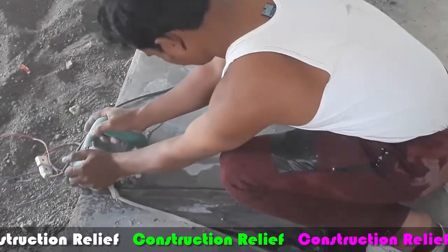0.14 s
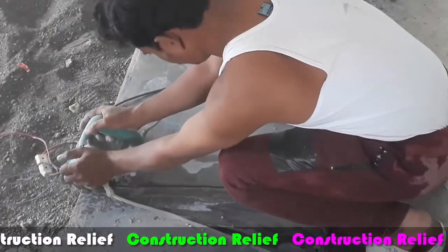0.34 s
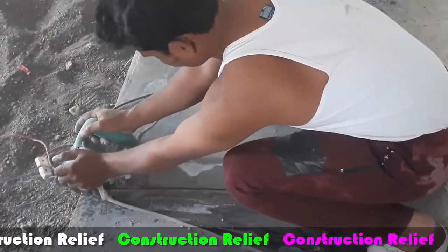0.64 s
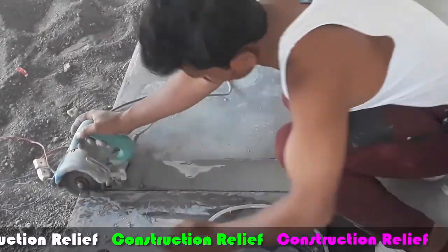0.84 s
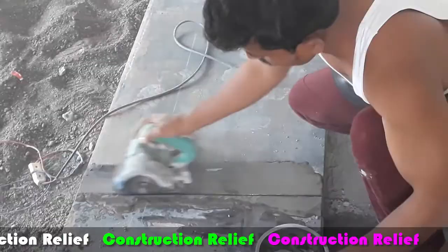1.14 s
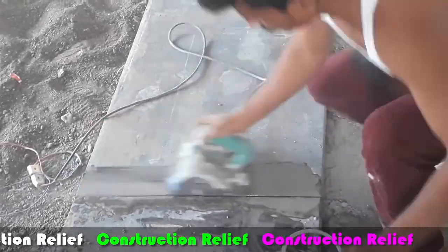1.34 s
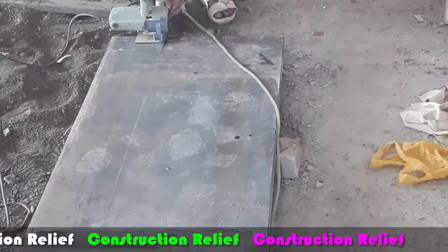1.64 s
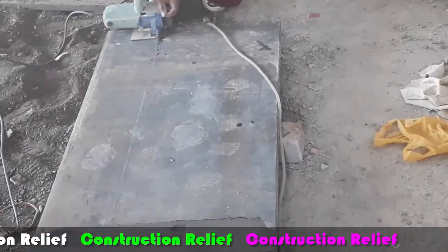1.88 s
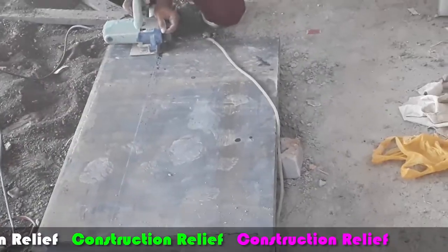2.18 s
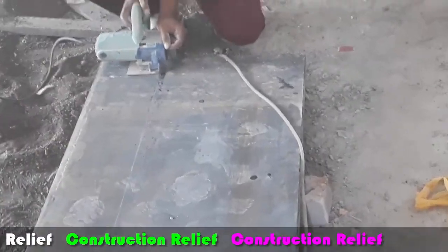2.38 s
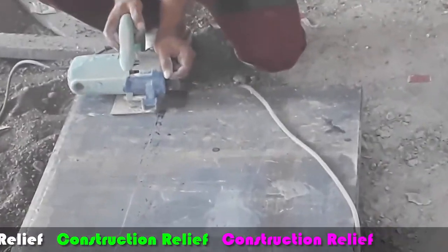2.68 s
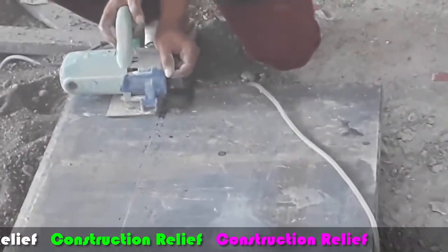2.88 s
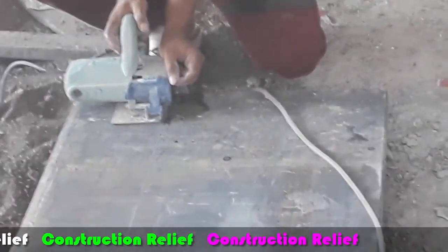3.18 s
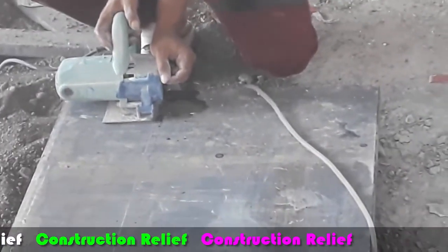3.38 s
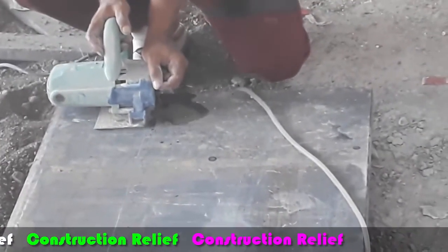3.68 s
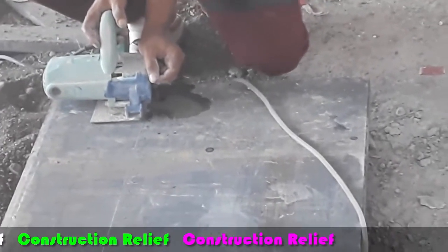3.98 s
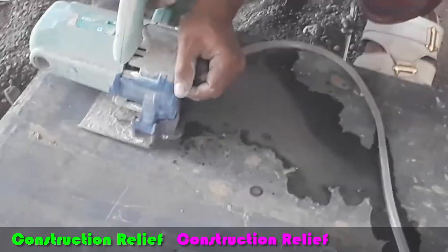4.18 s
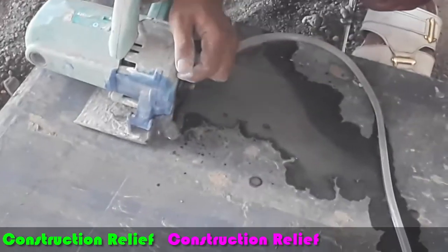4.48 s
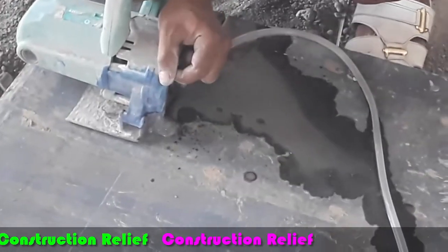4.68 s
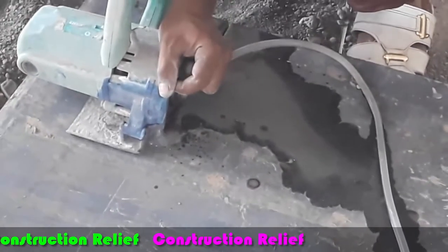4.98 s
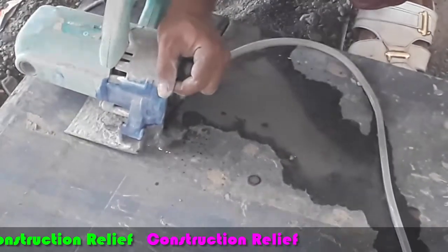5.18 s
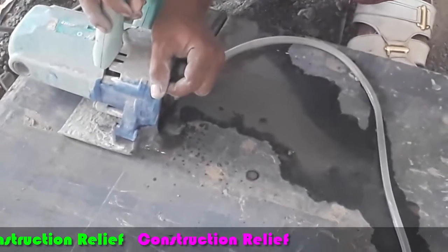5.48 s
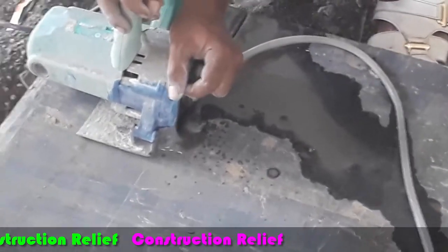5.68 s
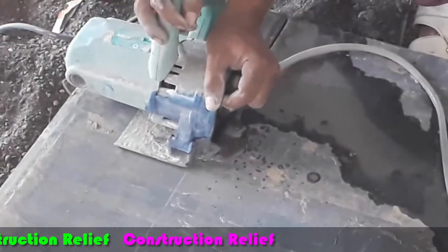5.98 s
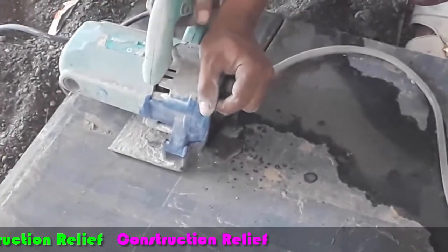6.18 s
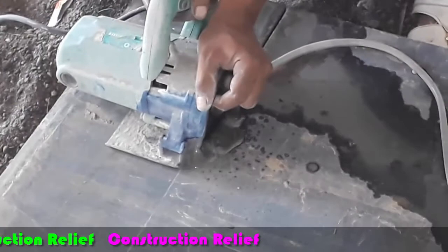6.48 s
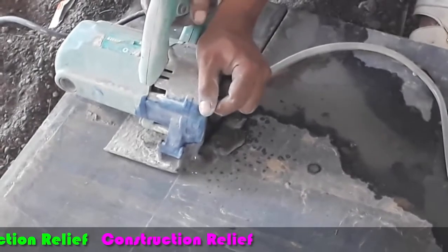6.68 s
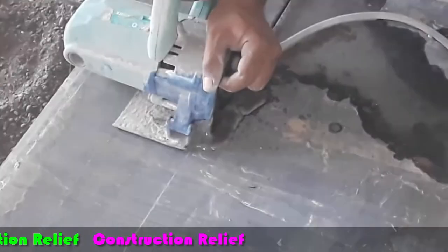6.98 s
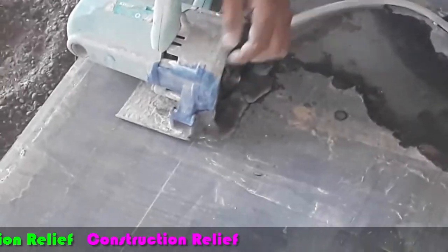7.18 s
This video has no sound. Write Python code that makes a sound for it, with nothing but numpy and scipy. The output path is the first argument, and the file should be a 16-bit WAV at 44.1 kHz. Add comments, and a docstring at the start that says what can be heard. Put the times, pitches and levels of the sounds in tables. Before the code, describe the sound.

Three joined takes of one power saw on a stone slab, centred, without noticeable echo. From behind, short rasping strokes and clicks end as the motor speeds up freely. From the front, the slower motor whirs and hisses almost evenly, with faint grit and knocks late on. Close by, continuous harsh grinding covers much of the whine, which swells upward in pitch twice clearly and once slightly.

```python
"""A hand-held electric cutter saws a wet stone slab outdoors, heard from three microphone positions:
from behind, at the end of a cut, the motor then racing free; from the front, fed gently into a new cut;
and close by, in a deep cut. The motor whines on its shaft orders, sines locked to the shaft's turning,
over the coloured noise of its fan; the diamond rim cracks off grains of stone, as random clicks
coloured by the slab."""
import sys
import numpy as np
from scipy import signal
from scipy.fft import rfft, irfft
from scipy.io import wavfile

SR = 44100
rng = np.random.default_rng(int(sys.argv[2]) if len(sys.argv) > 2 else 0)


def transcribe(signal):
    """Save signal, clipped to [-1, 1], as a 16-bit WAV file at the path in sys.argv[1]."""
    frames = np.atleast_2d(signal).T
    limited = np.clip(frames, -1, 1)
    pcm = np.round(limited * 32767).astype(np.int16)
    wavfile.write(sys.argv[1], SR, pcm)


N = 323694
T = np.arange(N) / SR

# fan and brush hiss: pitch_hz [Hz], behind_db [dB per Hz], front_db [dB per Hz]
FAN_SPECTRUM = [(30, -54.5, -54), (130, -54.5, -55.5), (300, -53, -54), (700, -51.5, -52.5),
                (1500, -50, -51.5), (3640, -53.5, -53), (7000, -50, -52), (9080, -47.5, -44.5),
                (12200, -42, -41.5), (13300, -35.5, -37.5), (14200, -33, -35.5), (15500, -43.5, -41.5)]
# whine over one hertz of hiss: order [per shaft turn], touching_db [dB], feeding_db [dB]
SHAFT_ORDERS = [(5, 22, 14), (6, 24, 18), (7, 19, 18), (8, 20, 22), (9, 22, 23), (10, 23, 22), (12, 22, 24),
                (13, 21, 22), (14, 27, 23), (15, 23, 20), (16, 20, 23), (18, 24, 30), (19, 24, 32),
                (20, 26, 29), (21, 20, 28), (22, 22, 26), (23, 24, 25), (24, 28, 25), (25, 28, 29),
                (26, 25, 26), (27, 29, 28), (28, 28, 21), (29, 27, 28), (30, 26, 26), (31, 26, 26),
                (32, 22, 24)]
# housing resonances, which light up the orders passing through: pitch_hz [Hz], width_hz [Hz], peak_db [dB]
HOUSING_RESONANCES = [(2930, 120, 7), (4400, 1400, 3), (7350, 200, 7), (10230, 260, 9)]
# motor speed as the blade runs out of the cut and races free: time_s [s], shaft_hz [turns per s]
RUN_OUT_SPEED = [(0.0, 536.1), (0.178, 528.6), (0.436, 583.3), (0.558, 642.1), (0.8, 708.9), (1.006, 740.1),
                 (1.022, 703.6), (1.144, 727.5), (1.482, 724.7), (1.556, 788.7), (1.756, 723.8),
                 (1.895, 639.1)]
# motor speed while the blade is set on the slab and fed in: time_s [s], shaft_hz [turns per s]
FEED_SPEED = [(1.91, 489.8), (2.05, 482.2), (2.13, 489.3), (2.24, 523.7), (2.31, 495.4), (2.41, 482.7),
              (2.68, 490.9), (2.96, 477.8), (3.38, 481.7), (3.59, 468.3), (3.96, 481.4), (4.09, 460.3),
              (4.13, 466.5)]
# orders that whistle up as the tool is turned: start_s [s], length_s [s], order [per turn], level_db [dB]
ORDER_WHISTLES = [(0, .26, 20, -35), (.66, .16, 5, -43), (.77, .16, 9, -43), (.91, .1, 5, -45),
                  (1.565, .08, 4, -41), (1.63, .19, 5, -40)]
# strokes in which the rim bites the stone: start_s [s], length_s [s], level_db [dB]
BITE_STROKES = [(0.0, 0.23, -27.5), (0.249, .02, -34), (.28, .065, -28.5), (0.37, 0.067, -28),
                (.457, 0.054, -27.5), (0.539, 0.064, -32.5), (0.881, 0.047, -37.5), (1.196, 0.028, -33.5),
                (1.239, 0.069, -30.5), (3.803, 0.045, -34), (3.889, .025, -34), (3.992, 0.062, -34),
                (4.092, 0.037, -36)]
# sound of breaking grains in a shallow cut: pitch_hz [Hz], level_db [dB]
SHALLOW_SPECTRUM = [(60, -31), (150, -20), (300, -5.5), (550, -0.5), (1000, -3.5), (2000, -7), (4000, -12),
                    (8000, -15.5), (15000, -12)]
# sound of breaking grains in a deep cut: pitch_hz [Hz], level_db [dB]
DEEP_SPECTRUM = [(60, -20), (150, -20.5), (300, -10.5), (500, -2.5), (1100, -1), (2200, -2), (4500, -4),
                 (8000, -6.5), (12000, -7), (16000, -12)]
# knocks of the rim on the edge of the cut: start_s [s], level_db [dB, before crack and crumb offsets]
RIM_KNOCKS = [(0.191, -16), (0.329, -16), (0.37, -13.5), (0.47, -13.5), (0.493, -17), (0.67, -18),
              (0.823, -22), (0.854, -17.5), (0.933, -24), (1.208, -25), (1.316, -19), (1.417, -24.5),
              (2.551, -18.5), (3.651, -19), (3.713, -22), (3.805, -20), (3.823, -23), (3.891, -22),
              (4.005, -17), (4.041, -17)]
# short scrapes of the rim along the stone: start_s [s], level_db [dB, before the scrape offset], length_s [s]
RIM_SCRAPES = [(1.002, -21.5, .03), (1.364, -23.5, .014), (1.851, -29, .021), (1.876, -28, .018)]
# the push eases, the motor picks up: start_s [s], rise_s [s], fall_s [s], gain_hz [turns per s]
PUSH_EASINGS = [(4.35, .23, .88, 86), (6.07, .09, .18, 19), (7.1, .18, .9, 93)]

# the microphone hears the front; the feed begins; the microphone is close to the deep cut (s)
FRONT_S, FEED_S, CLOSE_S = 1.9, 2.4, 4.143
# base level of fan and whine from behind, from the front and close by (dB)
MACHINE_BEHIND_DB, MACHINE_FRONT_DB, MACHINE_CLOSE_DB = -21, -21, -25.5
# usual shaft speed under load (turns per s); growth of the fan hiss (dB per doubling of speed)
LOADED_HZ, FAN_DB_PER_OCTAVE = 480, 0.5
# the tool is swung away once, and fan and whine dip: moment (s), half length (s), depth (dB)
SWING_S, SWING_HALF_S, SWING_DB = 1.503, 0.058, -5.5
# base level of the whine over one hertz of hiss, from behind and close by (dB)
BEHIND_DB, CLOSE_DB = 24.5, 27.5
# from behind, the housing lets out mainly the top of the whine: strongest pitch, loss below it
VENT_HZ, VENT_DB_PER_OCTAVE = 12000, 1.7
# one shaft order stands out under the load of the deep cut
LOADED_ORDER, LOADED_ORDER_DB = 21, 2.5
# bearing play smears the whine: pitch of all noise if unlimited (Hz), largest noisy share (0-1)
SMEAR_HZ, SMEAR_MAX = 21000, 0.45
# every bite sets in quickly and crumbles away (s)
BITE_ATTACK_S, BITE_RELEASE_S = 0.0073, 0.022
# the blade sinks into the new cut: start, first level and growth; the kerf damps the whine
SINK_S, SINK_DB, SINK_DB_PER_S, SINK_DAMP_DB = 3.56, -43.5, 14, -1.5
# roar of the deep cut (dB); an eased push dulls its treble: corner (Hz), dB per Hz of speed gained
DEEP_CUT_DB, ROAR_TREBLE_HZ, DULLING_DB_PER_HZ = -25.5, 2800, -0.02
# second order on a housing resonance, and fourth order; levels stand before the front gain of the hum
HUM_HZ, HUM_WIDTH_HZ, HUM_DB, FOURTH_DB = 966, 70, -39, -44.5
# the motor sags as the deep kerf lengthens: first speed (turns per s), sag (turns per s, each second)
DEEP_HZ, SAG_HZ_PER_S = 492, 4
# the whine stops and the recorder cuts off at this pitch
TOP_HZ = 15750


def undb(db):
    """Decibels to gain."""
    return 10 ** (np.asarray(db) / 20)


def curve(rows):
    """Rows of (s, value) joined by straight lines."""
    return np.interp(T, *np.transpose(rows))


def after(s):
    """A 4 ms fade from 0 to 1, centred on a moment."""
    return np.clip((T - s) / 0.004 + 0.5, 0, 1)


def by_position(behind, front, close):
    """A value that changes with the microphone position."""
    return behind + (front - behind) * after(FRONT_S) + (close - front) * after(CLOSE_S)


def spectrum_db(points, hz):
    """Read (Hz, dB) points on a log-frequency axis."""
    f, db = np.transpose(points)
    return np.interp(np.log(np.maximum(hz, 1)), np.log(f), db)


def colour(x, points):
    """Causal minimum-phase filter with the given spectrum, so that clicks keep a sharp front."""
    size = 2048
    log_gain = np.log(undb(spectrum_db(points, np.fft.rfftfreq(size, 1 / SR))))
    cepstrum = irfft(log_gain)
    # folding the cepstrum onto positive time makes the filter causal
    cepstrum[1:size // 2] *= 2
    cepstrum[size // 2 + 1:] = 0
    impulse = irfft(np.exp(rfft(cepstrum)))
    return signal.fftconvolve(x, impulse)[:N]


def walk(hz):
    """Smooth random motion of unit spread, about hz wide."""
    knots = rng.standard_normal(8192)
    f = np.fft.rfftfreq(len(knots), T[-1] / len(knots))
    slow = irfft(rfft(knots) / (1 + (f / hz) ** 2))
    return np.interp(T, np.linspace(0, T[-1], len(slow)), slow / slow.std())


def shaft_tone(turns, order):
    """One clean shaft order: a sine of unit power, locked to the turning shaft."""
    return np.sqrt(2) * np.sin(2 * np.pi * order * turns)


def speed():
    """Shaft turns per second: load slows the motor, release lets it race; it trembles a little."""
    deep = DEEP_HZ - SAG_HZ_PER_S * (T - CLOSE_S) + easing_hz()
    steady = by_position(curve(RUN_OUT_SPEED), curve(FEED_SPEED), deep)
    return steady * (1 + 0.001 * walk(25))


def motor():
    """Fan, whine, whistles, hum and bearing all follow one turning shaft."""
    hz = speed()
    turns = np.cumsum(hz) / SR
    swing = np.exp(-((T - SWING_S) / SWING_HALF_S) ** 4)
    position_db = by_position(MACHINE_BEHIND_DB, MACHINE_FRONT_DB, MACHINE_CLOSE_DB)
    machine_db = position_db + SWING_DB * swing
    fan_db = machine_db + FAN_DB_PER_OCTAVE * np.log2(hz / LOADED_HZ)
    hiss = undb(fan_db) * fan(turns)
    return hiss + whine(hz, turns, machine_db[::64]) + whistles(turns) + hum(hz, turns) + bearing(turns)


def fan(turns, pulsing=0.13, flicker_db=1.05, band_db=-13, band_flicker_db=3.0):
    """Air and brush hiss, pulsing with each turn of the shaft; a band of high treble flickers over it."""
    air, front = np.array(FAN_SPECTRUM), after(FRONT_S)
    noise = rng.standard_normal(N) * np.sqrt(SR / 2)  # unit power in each hertz
    rush = noise * (1 + pulsing * np.cos(2 * np.pi * turns))
    hiss = colour(rush, air[:, [0, 1]]) * (1 - front) + colour(rush, air[:, [0, 2]]) * front
    band = signal.butter(2, [13200, 14600], "bandpass", fs=SR, output="sos")
    treble = signal.sosfilt(band, rng.standard_normal(N))
    flickering_treble = treble / treble.std() * undb(band_db + band_flicker_db * walk(15))
    return hiss * undb(flicker_db * walk(21)) + flickering_treble


def whine(hz, turns, machine_db, sway_db=2.5):
    """Shaft orders: low ones clean, high ones smeared by bearing play; each sways as the tool moves."""
    air, out = np.array(FAN_SPECTRUM), 0
    # levels are worked out at every 64th sample
    slow_t, slow_hz = T[::64], hz[::64]
    # stage 0 behind, 1 touching, 2 feeding, 3 close
    stage = np.searchsorted([FRONT_S, FEED_S, CLOSE_S], slow_t)
    # past the first position, the whine slackens as the eased blade speeds up
    eased_db = np.clip((slow_hz - 500) / 5, 0, 4) * (stage > 0)
    # it is also damped as the kerf closes round the rim
    damped_db = SINK_DAMP_DB * (after(SINK_S) - after(CLOSE_S))[::64]
    for order, touching_db, feeding_db in SHAFT_ORDERS:
        pitch = order * slow_hz
        behind_db = BEHIND_DB - VENT_DB_PER_OCTAVE * np.maximum(np.log2(VENT_HZ / pitch), 0)
        close_db = CLOSE_DB + LOADED_ORDER_DB * (order == LOADED_ORDER)
        over_hiss_db = np.choose(stage, [behind_db, touching_db, feeding_db, close_db])
        housing_db = sum(peak / (1 + (2 * (pitch - f) / width) ** 2)
                         for f, width, peak in HOUSING_RESONANCES)
        hiss_behind_db = spectrum_db(air[:, [0, 1]], pitch)
        hiss_front_db = spectrum_db(air[:, [0, 2]], pitch)
        base_db = np.where(stage == 0, hiss_behind_db, hiss_front_db + housing_db)
        db = machine_db - eased_db + damped_db + over_hiss_db + base_db
        gain = np.interp(T, slow_t, undb(db) * (pitch < TOP_HZ)) * undb(sway_db * walk(7.4))
        rough = np.clip((order * hz / SMEAR_HZ) ** 2, 0, SMEAR_MAX)
        # a steady part and a noisy part share the power
        smear = np.sqrt(1 - rough) + np.sqrt(rough / 2) * (walk(70) + 1j * walk(70))
        spin = np.exp(2j * np.pi * (order * turns + rng.random()))
        out = out + gain * np.sqrt(2) * (smear * spin).real
    return out


def whistles(turns, flutter_db=3.0):
    """As the tool is turned, single shaft orders swell and fade in one arch, fluttering a little."""
    out = 0
    for start, length, order, db in ORDER_WHISTLES:
        arch = np.sin(np.pi * np.clip((T - start) / length, 0, 1))
        out = out + undb(db) * arch * shaft_tone(turns, order)
    return out * undb(flutter_db * walk(30))


def grains(per_s, spread_db):
    """Grains breaking off: random clicks of very unequal size, with a mean power of one."""
    chance = np.clip(per_s / SR, 0, 1)
    size = undb(spread_db * np.minimum(rng.exponential(size=N), 3))
    sign = rng.choice([-1, 1], N)
    clicks = (rng.random(N) < chance) * sign * size
    return clicks / np.sqrt(np.mean(size ** 2) * chance)


def stone(clicks, points):
    """Clicks coloured by the slab, scaled so that unit power gives unit level in the body of the sound."""
    body_hz = np.arange(400, 1700)
    body_power = np.sum(undb(spectrum_db(points, body_hz)) ** 2) * 2 / SR
    return colour(clicks, points) / np.sqrt(body_power)


def bite_force():
    """How hard the rim bites: strokes of attack, hold and release, then a steadily growing feed."""
    sunk_s = np.clip(T, SINK_S, CLOSE_S) - SINK_S
    force = undb(SINK_DB + SINK_DB_PER_S * sunk_s) * (after(SINK_S) - after(CLOSE_S))
    for start, length, db in BITE_STROKES:
        attack = np.clip((T - start) / BITE_ATTACK_S, 0, 1)
        release = np.exp(-np.maximum(T - start - length, 0) / BITE_RELEASE_S)
        force = force + undb(db) * attack * release
    return force


def cutting(shallow_per_s=700, deep_per_s=12000, catch_db=0.24, surge_db=0.61):
    """Grains break off one by one in a shallow cut, and merge into a roar in a deep one."""
    bite = bite_force()
    # a harder bite frees more grains, not only louder ones
    per_s = shallow_per_s * np.clip((bite / undb(-32)) ** 2, 0.1, 1.8)
    sparse = grains(per_s, spread_db=4) * bite * undb(catch_db * walk(34))
    deep_gain = undb(DEEP_CUT_DB + surge_db * walk(32)) * after(CLOSE_S)
    dense = grains(deep_per_s, spread_db=3) * deep_gain
    highpass = signal.butter(1, ROAR_TREBLE_HZ, "highpass", fs=SR, output="sos")
    treble = signal.sosfilt(highpass, dense)
    roar = dense - treble + treble * undb(DULLING_DB_PER_HZ * easing_hz())
    return stone(sparse, SHALLOW_SPECTRUM) + stone(roar, DEEP_SPECTRUM)


def knocks(crack_db=12, crumbs_db=-11, crumbs_s=0.004, scrape_db=-2):
    """A knock is one sharp crack with crumbs dying away after it; a scrape is a dense run of grains."""
    force, crumbs = np.zeros(N), grains(5000, spread_db=5.5)
    for s, db in RIM_KNOCKS:
        start = int(s * SR)
        force[start] += undb(db + crack_db)
        decay = np.exp(-T[:N - start] / crumbs_s)
        force[start:] += undb(db + crumbs_db) * crumbs[start:] * decay
    for s, db, length in RIM_SCRAPES:
        swell = np.exp(-(2 * (T - s) / length - 1) ** 4)
        force += undb(db + scrape_db) * crumbs * swell
    return stone(force, SHALLOW_SPECTRUM)


def hum(hz, turns, sway_db=1.5, fourth_sway_db=2):
    """From the front, the housing hums on two low orders; the second fades away from its resonance."""
    resonance = 1 / np.hypot(1, 2 * (2 * hz - HUM_HZ) / HUM_WIDTH_HZ)
    second = resonance * undb(HUM_DB + sway_db * walk(11)) * shaft_tone(turns, order=2)
    fourth = undb(FOURTH_DB + fourth_sway_db * walk(4.7)) * shaft_tone(turns, order=4)
    return (second + fourth) * by_position(0, 0.91, 0)


def bearing(turns, level_db=-51, sway_db=2):
    """From the front and close by, the bearing balls sing at two pitches between the shaft orders."""
    balls = np.sin(2 * np.pi * 4.6 * turns) + np.sin(2 * np.pi * 7.5 * turns)
    return undb(level_db + sway_db * walk(2)) * balls * after(FRONT_S)


def easing_hz():
    """Speed gained as the push eases in the deep cut: a rise and then a fall each time."""
    return sum(curve([(start, 0), (start + rise, gain), (start + rise + fall, 0)])
               for start, rise, fall, gain in PUSH_EASINGS)


def scene():
    """Machine and stone reach one microphone, the same on both channels."""
    mono = motor() + cutting() + knocks()
    return np.array([mono, mono])


def record(dry):
    """The recorder rounds the sharpest cracks and cuts the top off steeply."""
    rounded = np.tanh(dry * 0.9) / 0.9
    lowpass = signal.ellip(10, 0.1, 60, TOP_HZ, fs=SR, output="sos")
    return signal.sosfiltfilt(lowpass, rounded)


dry = scene()
out = record(dry)
transcribe(out)
```